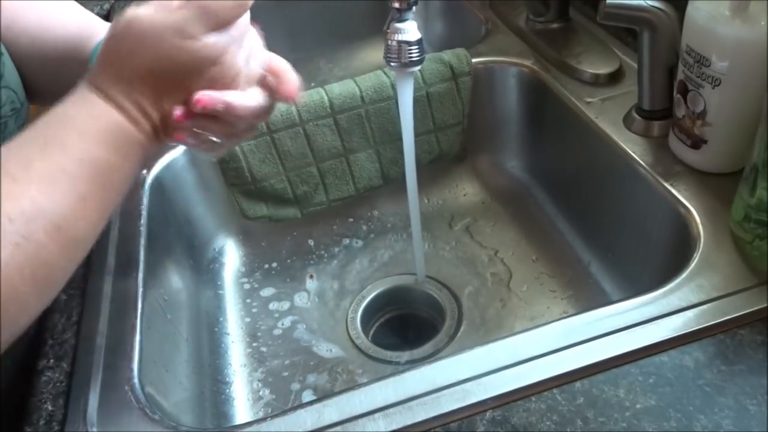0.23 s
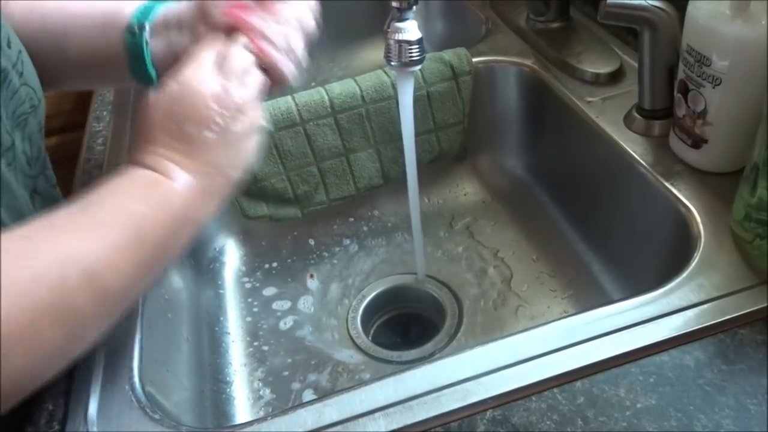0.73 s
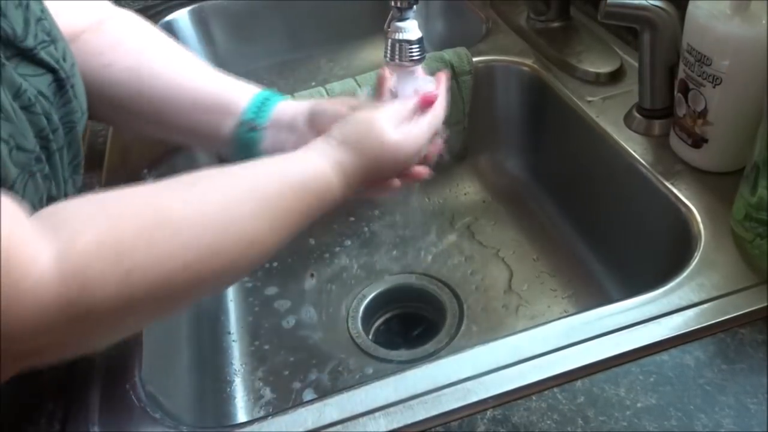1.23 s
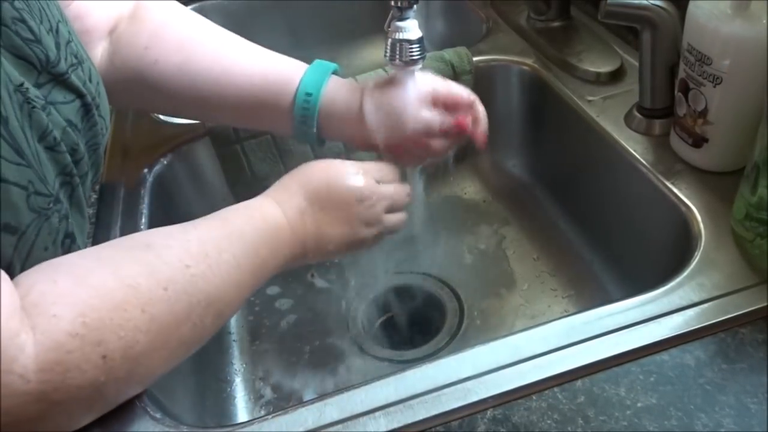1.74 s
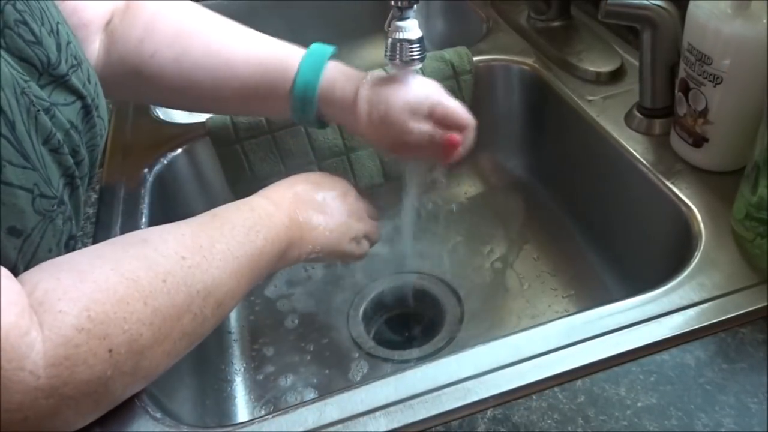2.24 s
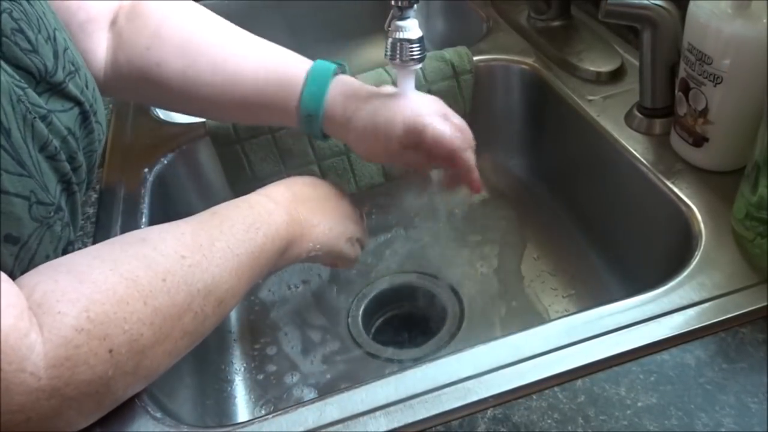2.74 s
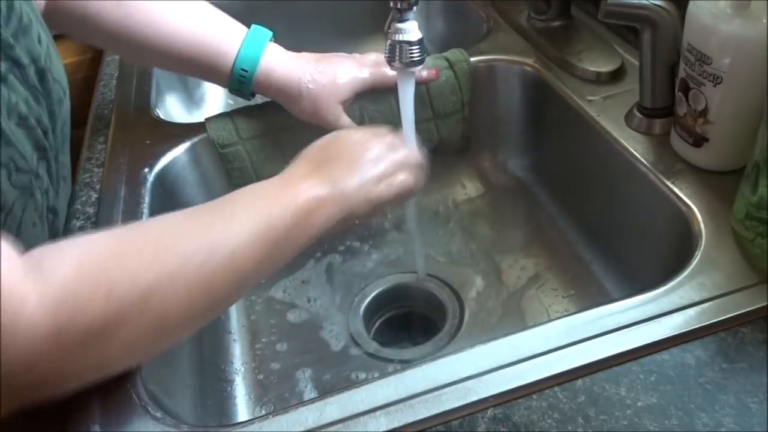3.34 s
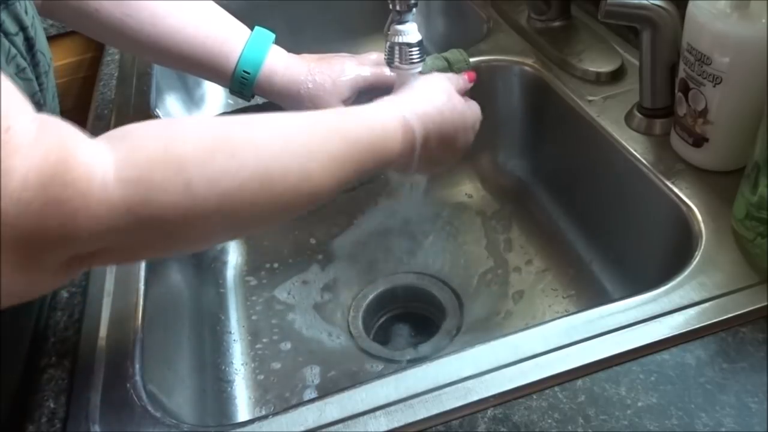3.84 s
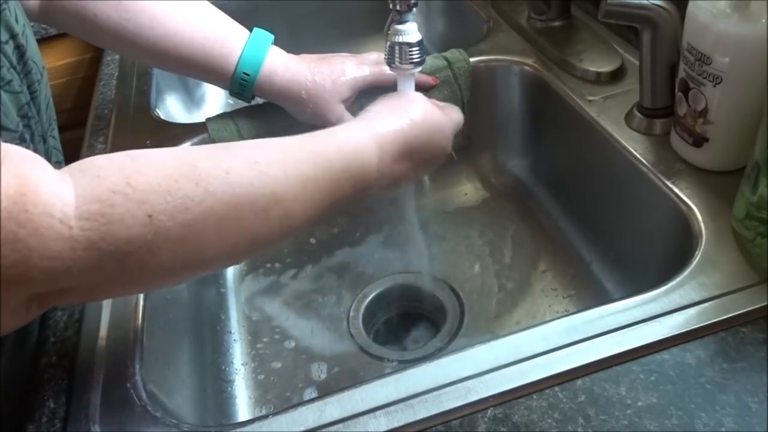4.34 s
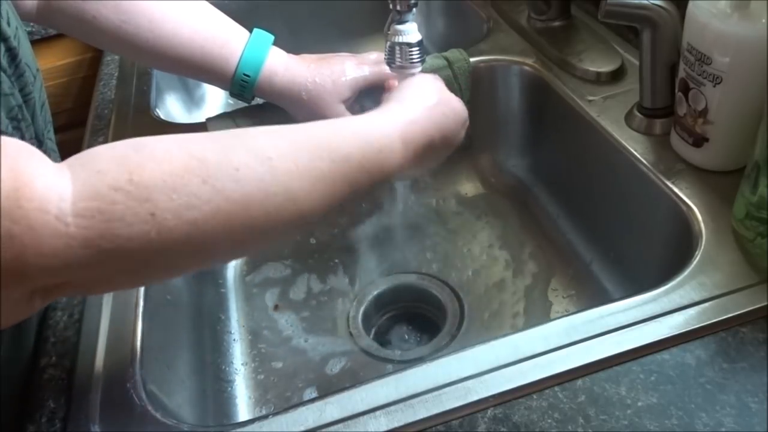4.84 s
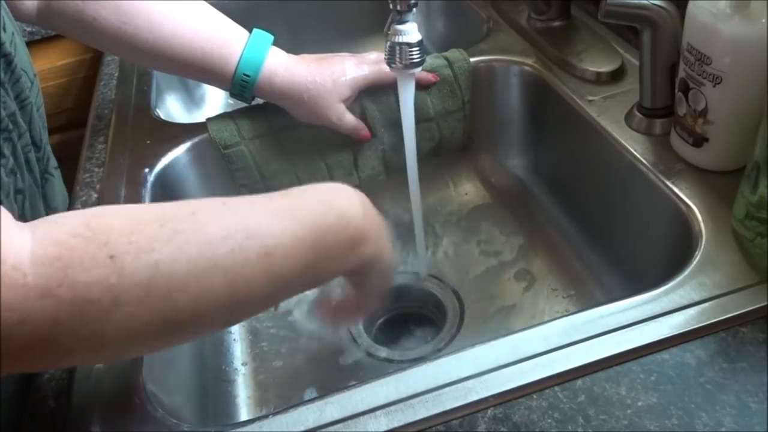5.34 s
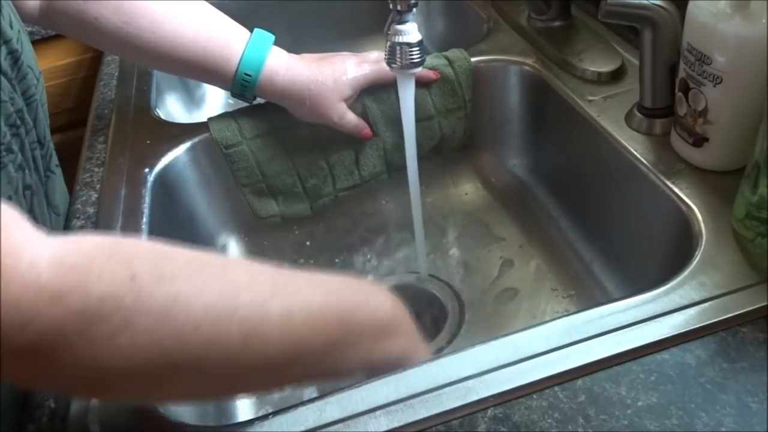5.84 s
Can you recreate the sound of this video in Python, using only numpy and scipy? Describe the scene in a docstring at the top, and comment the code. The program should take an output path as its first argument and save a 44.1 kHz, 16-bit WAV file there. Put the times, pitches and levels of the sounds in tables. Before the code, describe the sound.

A kitchen tap runs into a steel sink, its bright fizz breaking into coarser spatter, squelches and ringing drips as hands are rinsed.

```python
"""Rinsing hands under a kitchen tap

An aerated tap runs into a steel sink while someone rinses their hands under it.
The free jet is a dense rain of tiny clicks, a fine fizz; behind it, the drain gurgles with low bubbles.
When a hand breaks the jet, the clicks turn coarser and duller, and drops patter on the ringing basin.
Bubbles ring as short dying tones. Squelching hands and slapping handfuls are short bursts of clicks.
"""
import sys
import numpy as np
from scipy import signal
from scipy.fft import rfft, irfft
from scipy.io import wavfile

SR = 44100
rng = np.random.default_rng(int(sys.argv[2]) if len(sys.argv) > 2 else 0)


def wav_out(sig):
    """Save sig, one row per channel (or a flat mono array), as 16-bit PCM at SR to the path in sys.argv[1]."""
    wavfile.write(sys.argv[1], SR, np.round(np.clip(np.atleast_2d(sig).T, -1, 1) * 32767).astype(np.int16))


N = 269186
TIME = np.arange(N) / SR   # seconds

# Levels in tables and settings are relative: trims in the functions below may shift them.
# when the jet falls freely to the drain; cut_s is the time the hand takes to cut it:
# start_s, end_s, cut_s, fizz_db, bubbles_db
FREE_JET = [(-0.1, 1.131, 0.044, -22, -27.5), (3.11, 3.46, 0.027, -25, -30),
            (5.355, 5.575, 0.12, -25.5, -27.5), (5.876, 6.2, .08, -25, -33.5)]
# when a cupped hand cushions the stream, then spills; loss_db is taken from the spray:
# start_s, end_s, close_s, spill_s, loss_db
CUPPED = [(1.19, 1.568, 0.19, 0.16, 10.5), (2.18, 2.234, .02, .02, 2), (3.058, 3.077, .01, .006, 11),
          (3.536, 3.724, .08, .14, 9.5), (4.017, 4.282, .05, 0.13, 1.5), (4.8, 5.046, 0.049, 0.027, 4),
          (5.134, 5.199, 0.026, .01, 8.5), (5.64, 5.838, 0.14, .012, 20.5)]
# water that runs off the hands onto the basin floor: time_s, patter_db
RUNOFF = [(1.15, -33.5), (1.5, -33.5), (2.1, -31.5), (2.35, -33), (3.02, -30.5), (3.15, -38), (3.65, -34),
          (3.9, -34), (4.15, -32), (4.35, -33), (4.75, -28.5), (4.9, -34.5), (5.3, -35), (5.8, -36.5)]
# single large bubbles: start_s, pitch_hz, peak_db
PLINKS = [(0.131, 1620, -14), (0.428, 2200, -15), (0.596, 7400, -8), (0.614, 3430, -7.5), (0.795, 5360, -4),
          (0.9408, 3120, -9), (1.573, 2700, -13.5), (1.6266, 7540, -8), (1.65, 4330, -7), (1.951, 3760, -9),
          (2.03, 7400, -5), (2.1105, 3760, -10.5), (2.262, 3880, -10), (2.3036, 6160, -3.5),
          (2.3044, 3500, -5.5), (2.4157, 3230, -8), (2.7652, 4700, -2), (3.085, 5800, -8),
          (3.0947, 2970, -12), (3.1367, 3940, -11), (3.173, 6890, -7), (3.487, 3050, -17),
          (3.5573, 3700, -9), (3.788, 5230, -7), (3.9971, 6500, -2.5), (4.163, 4140, -12),
          (4.229, 5560, -8), (4.474, 3500, -8), (4.7696, 4200, -7), (4.808, 4040, -5.5),
          (4.818, 1720, -14.5), (5.0464, 4860, -7), (5.2142, 2260, -9), (5.325, 4100, -5),
          (5.3677, 3880, -4), (5.417, 1930, -18), (5.863, 2520, -5.5)]
# squelches of wet hands and handfuls that slap down: peak_time_s, decay_s, centre_hz, level_db, width_octaves
SPLASHES = [(0.127, 0.011, 1940, -22.5, .9), (0.226, 0.021, 3000, -18.5, 2.5),
            (0.436, 0.016, 2500, -26, 1.7), (1.282, 0.0063, 4200, -22.5, 1.8),
            (1.85, 0.035, 3540, -24.5, .8), (2.287, 0.02, 3670, -16, 1.2), (2.461, 0.016, 11000, -27, .9),
            (2.835, 0.0077, 4800, -23, 2.3), (2.882, 0.0073, 10000, -18, 1.3), (2.91, 0.018, 4440, -16, 1),
            (2.968, 0.028, 6000, -21, 1.24), (3.13, .021, 3520, -20, 1.5), (4.391, 0.049, 4970, -24.5, 1.5),
            (4.42, .016, 1530, -19, 0.72), (4.481, 0.012, 6400, -18.5, 1.3),
            (4.54, 0.035, 3970, -25.5, 0.68), (4.626, 0.03, 4670, -18.5, 0.85),
            (4.686, 0.013, 3860, -21.5, 0.6), (5.082, 0.014, 4230, -28, 1.9),
            (5.135, 0.011, 2700, -24.5, 0.54), (5.211, 0.0064, 7000, -16, 2.3),
            (5.216, 0.026, 2300, -23.5, 1.2), (5.375, 0.034, 4440, -20.5, 0.81),
            (5.595, 0.066, 2130, -28.5, 0.48), (5.848, 0.012, 8500, -17, 1.5),
            (5.859, 0.018, 3550, -15, 1.54), (5.885, 0.063, 2350, -22.5, 2.8)]
# soft low bumps: time_s, peak_db
BUMPS = [(1.055, -61), (1.575, -63), (1.96, -55), (2.3, -55), (3.095, -60), (3.8, -59), (3.997, -51),
         (4.48, -67), (5.335, -60), (5.86, -58)]
# colour of the fizz: frequency_hz, level_db (per Hz)
FIZZ = [(400, -37), (1500, -18), (3000, -5), (5000, 0), (7000, 1.5), (9000, 2), (10500, 2.1), (13000, 0.5),
        (14500, 1.5), (16000, -5.5)]
# colour of the small bubbles: frequency_hz, level_db (per Hz)
BUBBLES = [(400, -22), (1500, -17), (2200, -5), (3000, -1.5), (3800, -0.5), (5000, -1), (6300, -4.5),
           (8000, -8), (11000, -18)]
# colour of drops tapping the basin: frequency_hz, level_db (per Hz)
PATTER = [(300, -40), (600, -8.5), (800, -6), (1000, 1.5), (1350, 0), (1800, -1.5), (2300, 2), (3000, -6.5),
          (5000, -23), (9000, -13)]
# colour of the water's weight on the basin: frequency_hz, level_db (per Hz)
THRUM = [(30, -39), (70, -35), (120, -13.5), (170, -14), (250, -8), (330, 3), (420, 2.5), (500, 2),
         (650, 3), (900, 4), (1600, -33)]
# colour of the churning in the drain: frequency_hz, level_db (per Hz)
GURGLE = [(100, -25), (150, -22.5), (200, -10.5), (250, -16.5), (320, -10.5), (390, -6), (470, -11.5),
          (680, -4), (810, -0.5), (1100, -1), (1380, -5), (1650, -0.5), (2200, 0.5)]
# tones at which the basin rings: pitch_hz, width_hz, lift_db
BASIN_MODES = [(164, 14, 3), (188, 34, 8.5), (294, 7.3, 4), (408, 12, 5.5), (825, 13, 4), (910, 41, 2),
               (1494, 46, 3.5), (1697, 30, 7), (1843, 59, 8.5), (2142, 110, 4)]
# tones at which the drain rings: pitch_hz, width_hz, lift_db
DRAIN_MODES = [(3240, 120, 8.6), (4070, 53, 6.3), (5460, 300, 5.6), (6920, 1100, 2.9), (10500, 210, 0.93),
               (12450, 260, 1.7)]
# gain of the side signal, which sets how wide the scene sounds: frequency_hz, side_gain_db
WIDTH = [(60, -2), (200, -16), (400, -15), (700, -13.5), (1300, -9.5), (2400, -7.5), (4400, -3),
         (8000, -.8), (15000, -.6)]

JET_RETURN_S = 0.056   # the hand slides out of the stream
SPRAY_DB, SPRAY_BUBBLES_DB = -29, -26.5   # the stream while it breaks on a hand
BUBBLES_FOLLOW = 0.53   # share of the cupped hand's loss that the bubbles suffer too
DRUM_BELOW_PATTER_DB, GURGLE_BELOW_FIZZ_DB = 12, 13
PLINK_CYCLES = 29   # every large bubble fades by 60 dB over this many cycles
SPLASH_RISE = 0.64   # rise time as a share of the decay time
DUMP_DB, DUMP_S = -40, 0.045   # water dropped as the hand leaves the stream: level, half length
CUTOFF_HZ = 15850


def stream():
    """What the hands do to the water: share of free jet, level of the fizz, level of the bubbles."""
    loss_db = sum(db * spell(start, end, close_s, spill_s) for start, end, close_s, spill_s, db in CUPPED)
    free = 0
    fizz_db = SPRAY_DB - loss_db
    bubble_db = SPRAY_BUBBLES_DB - BUBBLES_FOLLOW * loss_db
    for start, end, cut_s, jet_db, jet_bubbles_db in FREE_JET:
        share = spell(start, end, JET_RETURN_S, cut_s)
        free = free + share
        fizz_db = fizz_db + share * (jet_db - SPRAY_DB)
        bubble_db = bubble_db + share * (jet_bubbles_db - SPRAY_BUBBLES_DB)
    return np.clip(free, 0, 1), fizz_db, bubble_db


def spell(start, end, rise_s, fall_s):
    """One between two moments and zero outside, with a ramp centred on each."""
    rise, fall = (TIME - start) / rise_s, (end - TIME) / fall_s
    return np.clip(.5 + np.minimum(rise, fall), 0, 1)


def wobble(free, jet_db=0.66, broken_db=0.62, per_s=28):
    """Chance swings of level in dB, about equally large in the free jet and the broken stream."""
    return (free * jet_db + (1 - free) * broken_db) * drift(per_s)


def fizz(level_db, free, free_per_s=24000, free_spread_db=4.0, broken_per_s=9000, broken_spread_db=4.5,
         flutter_db=1.42, free_trim_db=1.5, broken_trim_db=0.5, dull_hz=11000):
    """Foam bursts finely and evenly on the drain; off a hand it comes in coarser, duller spurts."""
    on_drain = resonate(coloured(impacts(free_per_s, free_spread_db), FIZZ), DRAIN_MODES)
    off_hand = coloured(impacts(broken_per_s, broken_spread_db), FIZZ)
    off_hand = signal.lfilter(*signal.butter(1, dull_hz, fs=SR), off_hand)
    on_drain = at_level(on_drain * from_db(flutter_db * drift(90)), level_db + free_trim_db)
    off_hand = at_level(off_hand * spurts(), level_db + broken_trim_db)
    # square roots keep the power steady while one sound fades into the other
    return np.sqrt(free) * on_drain + np.sqrt(1 - free) * off_hand


def spurts(per_s=70, decay_s=0.013, depth=0.48, spread_db=2.34):
    """Gain of a broken stream: each lump of water lands at once and spatters out."""
    landings = np.abs(impacts(per_s, spread_db)[0])
    lumps = signal.lfilter([1], [1, -np.exp(-1 / (decay_s * SR))], landings)
    return rms_one(1 + depth * lumps)


def bubbles(level_db, per_s=5500, spread_db=2.5, cycles=11,
            drips_per_s=170, drip_spread_db=4.5, drip_cycles=12, drips_db=-6.5):
    """Small trapped bubbles ring in crowded spurts, and a few single drips stand out of them."""
    pitches_hz = np.geomspace(1500, 10000, 26)
    crowd = at_level(ringing(per_s, spread_db, cycles, pitches_hz), 0)
    crowd = crowd * spurts(per_s=70, decay_s=0.0075, depth=0.68)
    drips = at_level(ringing(drips_per_s, drip_spread_db, drip_cycles, pitches_hz), drips_db)
    return at_level(coloured(crowd + drips, BUBBLES), level_db)


def ringing(per_s, spread_db, cycles, pitches_hz, crowding=0):
    """Bubbles of many sizes, each ringing briefly at its own pitch; crowding makes small ones commoner."""
    out = 0
    shares = pitches_hz ** crowding / np.sum(pitches_hz ** crowding)
    for hz, share in zip(pitches_hz, shares):
        # a click fades by 60 dB over the given number of cycles
        fade = from_db(-60 * hz / (cycles * SR))
        turn = 2 * np.pi * hz / SR
        clicks = impacts(per_s * share, spread_db)
        rings = signal.lfilter([1, 0, -1], [1, -2 * fade * np.cos(turn), fade * fade], clicks)
        out = out + at_level(rings, 0) * np.sqrt(hz)   # even power per Hz
    return out


def basin(patter_db, drum_db, drops_per_s=2200, spread_db=2.0, lumps_per_s=1500, lump_spread_db=2.5):
    """Drops tap the steel, and the weight of the water sets its low modes drumming."""
    taps = resonate(coloured(impacts(drops_per_s, spread_db), PATTER), BASIN_MODES)
    drum = resonate(coloured(impacts(lumps_per_s, lump_spread_db), THRUM), BASIN_MODES)
    return at_level(taps, patter_db) + at_level(drum, drum_db)


def drumming(patter_db, free):
    """Weight of water on the basin in dB: the run-off, and a handful whenever the hand leaves the stream."""
    handfuls = sum(np.exp(-((TIME - start) / DUMP_S) ** 2) for start, *_ in FREE_JET)
    runoff = from_db(patter_db - DRUM_BELOW_PATTER_DB - 10.6 * free)
    return 20 * np.log10(np.hypot(runoff, from_db(DUMP_DB) * handfuls))


def plinks(rise=0.015, side=0.67, birth_cycles=0.51, tick_db=-8, tick_s=0.00031):
    """A drop ticks, and the bubble that it traps rings, rising a little in pitch as it nears the surface."""
    out, t = np.zeros((2, N)), TIME[:SR // 20]
    for s, hz, peak_db in PLINKS:
        age = t * hz / PLINK_CYCLES
        envelope = from_db(-60 * age) * (1 - np.exp(-t * hz / birth_cycles))
        phase = 2 * np.pi * hz * t * (1 + rise * age)
        place = side * rng.uniform(-0.9, 1)
        ring = envelope * np.array([np.sin(phase), place * np.cos(phase)])
        bright_noise = np.diff(rng.standard_normal((2, len(t) + 1))) / 2
        tick = from_db(tick_db) * np.exp(-t / tick_s) * bright_noise
        start = round(s * SR)
        out[:, start:start + len(t)] += from_db(peak_db) * (ring + tick)
    return out


def splashes(per_s=6000, spread_db=1.5):
    """Each splash is a crowd of drops that swells and dies away."""
    out, t = np.zeros((2, N)), TIME[:SR // 4]
    for s, decay_s, hz, level_db, octaves in SPLASHES:
        edges_hz = [hz / 2 ** (octaves / 2), min(hz * 2 ** (octaves / 2), .45 * SR)]
        band = signal.butter(2, edges_hz, "band", fs=SR, output="sos")
        crowd = signal.sosfilt(band, impacts(per_s, spread_db, size=len(t)))
        start = round((s - .07) * SR)   # leave room for the swell before the peak
        since = t + start / SR - s
        swell = (since / (SPLASH_RISE * decay_s)) ** 2
        envelope = np.exp(-np.where(since < 0, swell, since / decay_s))
        out[:, start:start + len(t)] += at_level(crowd, level_db) * envelope
    return out


def gurgle(level_db, per_s=1700, spread_db=1.5, cycles=30, width_db=5.0):
    """The free jet churns the water deep in the drain, where larger bubbles ring lower and sound wider."""
    pitches_hz = np.geomspace(165, 2300, 32)
    churn = coloured(ringing(per_s, spread_db, cycles, pitches_hz, crowding=1.3), GURGLE)
    mid, side = at_level(churn, level_db)
    return np.array([mid, from_db(width_db) * side])


def bumps(width_s=0.0032):
    """Faint, dull low bumps at set times, each one smooth pulse."""
    return sum(from_db(db) * np.exp(-((TIME - s) / width_s) ** 2) for s, db in BUMPS)


def echoes(x, t60, level_db, gap_s, count):
    """Dense reflections, separate for mid and side, shifting as the water lands now here, now there."""
    t = TIME[:round((gap_s + t60) * SR) + 1]
    places = np.array([drift(45) for _ in range(count)])
    places /= np.sqrt(np.sum(places ** 2, axis=0))   # the shares always add up to the same power
    out = 0
    for share, noise in zip(places, rng.standard_normal((count, 2, SR))):
        tail = noise[:, :len(t)] * from_db(-60 * t / t60) * (t > gap_s)
        tail *= from_db(level_db) / np.sqrt(np.sum(tail ** 2, axis=1, keepdims=True))
        out = out + signal.oaconvolve(x[:1] * share, tail, axes=1)[:, :N]
    return out


def impacts(per_s, spread_db, size=N):
    """Random clicks of uneven size, as mid and side: each lands at the left or at the right."""
    born = np.flatnonzero(rng.random(size) < per_s / SR)
    chance = rng.random(size)[:len(born)]
    sizes = from_db(spread_db * np.minimum(-np.log(chance), 4.5))
    clicks = np.full((2, size), 1e-18)
    positive = rng.integers(0, 2, (2, size), dtype=bool)[:, :len(born)]
    clicks[:, born] = np.where(positive, sizes, -sizes)
    return clicks


def resonate(x, modes):
    """Lift a sound at each resonance of a body."""
    for hz, width_hz, lift_db in modes:
        peak = signal.lfilter(*signal.iirpeak(hz, hz / width_hz, fs=SR), x)
        x = x + (from_db(lift_db) - 1) * peak
    return x


def coloured(x, spectrum, size=4096):
    """Filter a sound to the given spectrum, with the response as early as possible (minimum phase)."""
    hz = np.arange(size // 2 + 1) * SR / size
    cepstrum = irfft(np.log(from_db(at_hz(spectrum, hz))))
    # folding the cepstrum onto its first half puts nothing ahead of the click
    cepstrum[1:size // 2] *= 2
    cepstrum[size // 2 + 1:] = 0
    response = irfft(np.exp(rfft(cepstrum)))
    return signal.fftconvolve(np.atleast_2d(x), response[None], axes=1)[:, :N]


def at_hz(points, hz):
    """Read a spectrum on a log-frequency axis."""
    f, db = np.transpose(points)
    return np.interp(np.log(hz + 1e-9), np.log(f), db)


def drift(rate):
    """Smooth chance of spread one, with about `rate` turns a second."""
    knots = rng.standard_normal(4096)
    return rms_one(np.interp(TIME * rate, np.arange(len(knots)), knots))


def at_level(x, db):
    """Scale a mid-side pair to a mid of power one, then apply a level that may change over time."""
    return x / np.sqrt(np.mean(x[0] ** 2) + 1e-20) * from_db(db)


def rms_one(x):
    """Scale to a power of one."""
    return x / np.sqrt(np.mean(x ** 2) + 1e-20)


def from_db(db):
    """Decibels to gain."""
    return 10 ** (np.asarray(db) / 20)


def scene():
    """Water in the basin, the basin's walls and the kitchen, heard by a close pair of microphones."""
    free, fizz_db, bubble_db = stream()
    patter_db = np.interp(TIME, *np.transpose(RUNOFF))
    water = fizz(fizz_db + wobble(free), free) + bubbles(bubble_db)
    # the unbroken jet hardly touches the basin floor
    water += basin(patter_db - 9.2 * free, drumming(patter_db, free))
    water += from_db(3.0) * plinks() + from_db(-0.2) * splashes()
    water += np.sqrt(free) * gurgle(fizz_db - GURGLE_BELOW_FIZZ_DB)
    walls = echoes(water, t60=0.06, level_db=-5, gap_s=0.00074, count=8)
    kitchen = echoes(water, t60=0.14, level_db=-11.5, gap_s=.008, count=2)
    # a steep cut below about 112 Hz leaves almost no bass
    bass_cut = signal.butter(4, 112, "high", fs=SR, output="sos")
    mid, side = signal.sosfilt(bass_cut, water + walls + kitchen)
    mid = mid + bumps()
    side = coloured(side, WIDTH)[0]
    return np.array([mid + side, mid - side]) * from_db([[-.45], [.45]])   # left, right


def record(dry):
    """Peaks beyond full scale are clipped; then the top is cut steeply."""
    top_cut = signal.ellip(12, .1, 80, CUTOFF_HZ, fs=SR, output="sos")
    return signal.sosfilt(top_cut, np.clip(dry, -1, 1))


dry = scene()
out = record(dry)
wav_out(out)
```